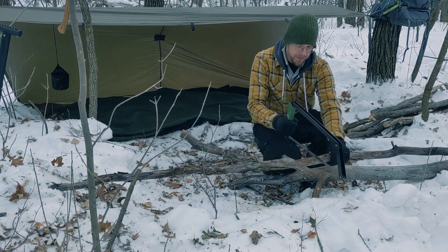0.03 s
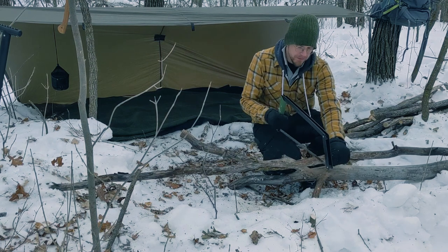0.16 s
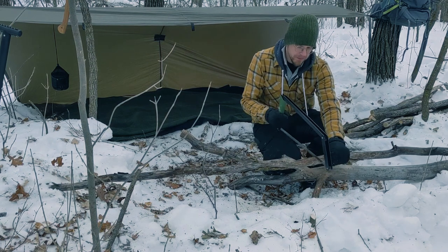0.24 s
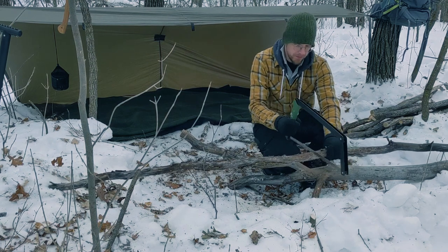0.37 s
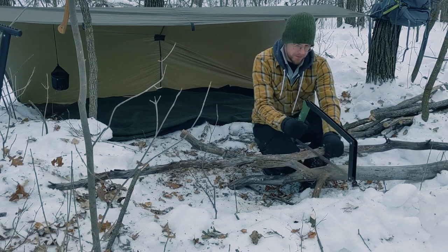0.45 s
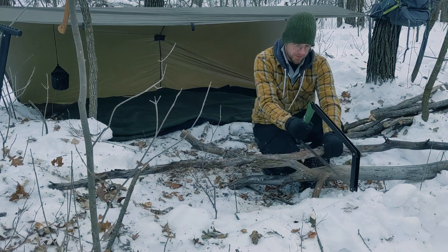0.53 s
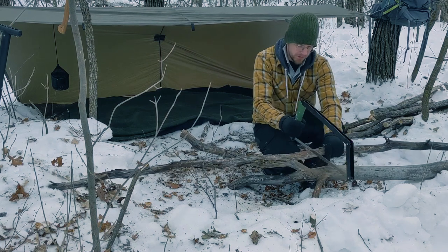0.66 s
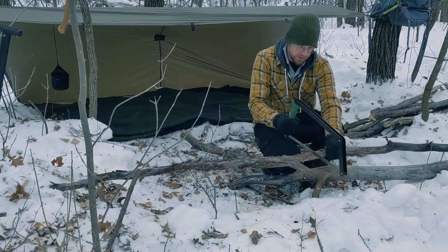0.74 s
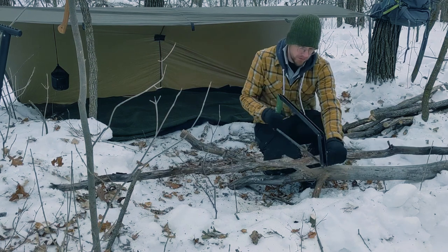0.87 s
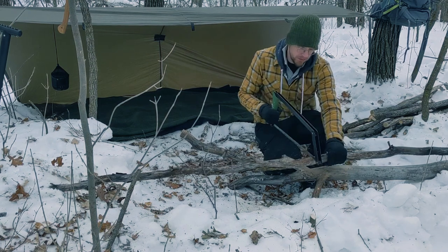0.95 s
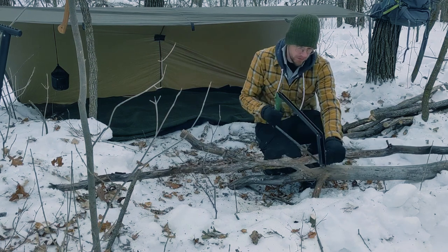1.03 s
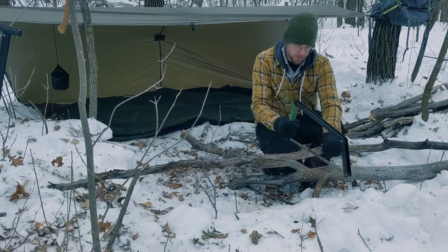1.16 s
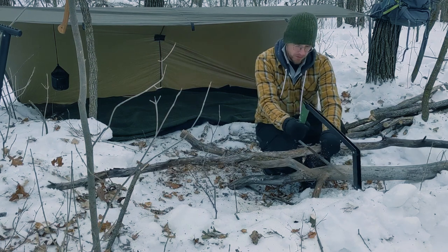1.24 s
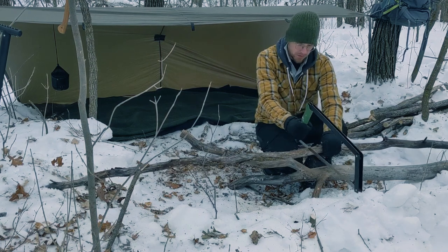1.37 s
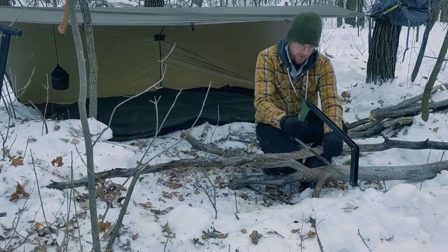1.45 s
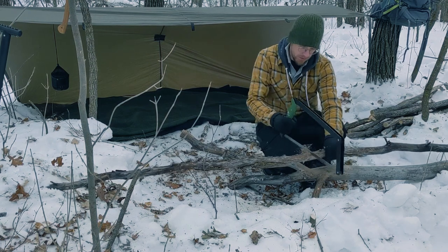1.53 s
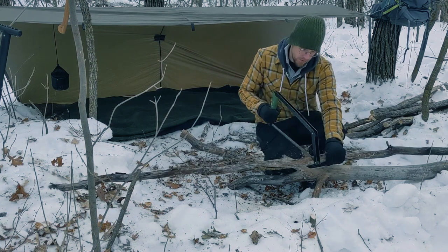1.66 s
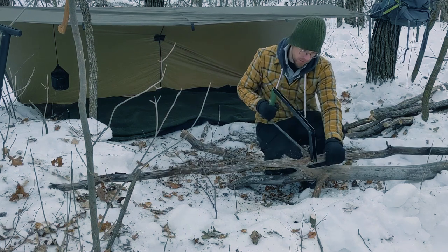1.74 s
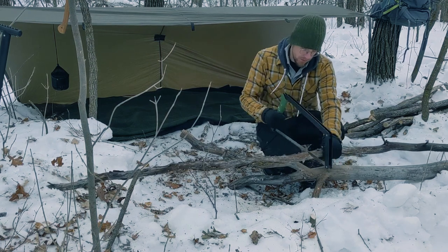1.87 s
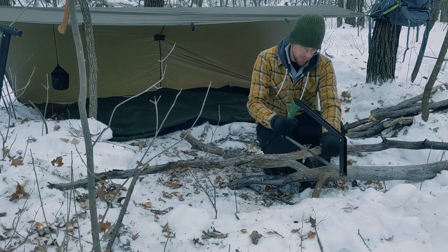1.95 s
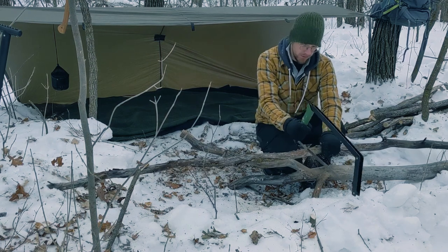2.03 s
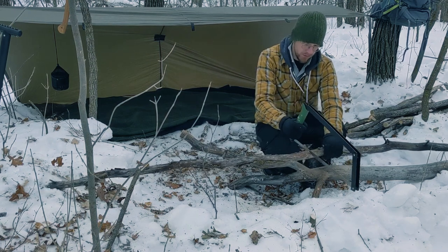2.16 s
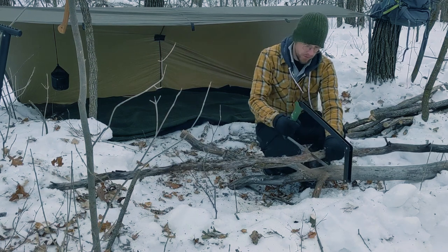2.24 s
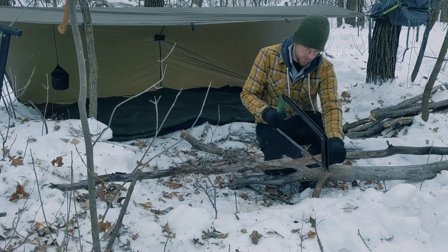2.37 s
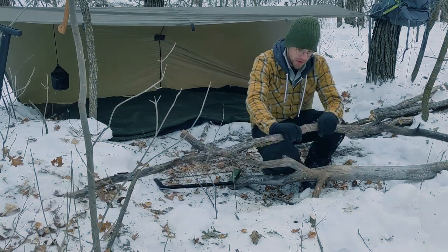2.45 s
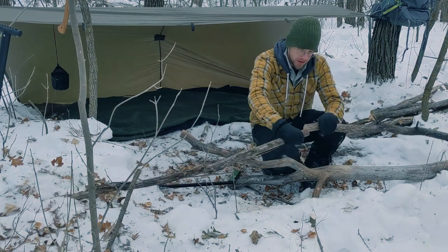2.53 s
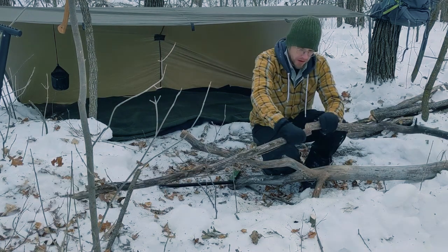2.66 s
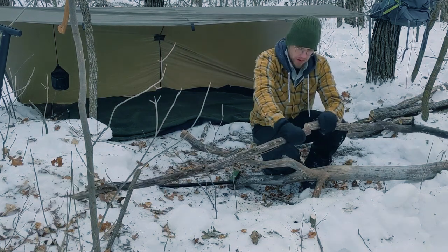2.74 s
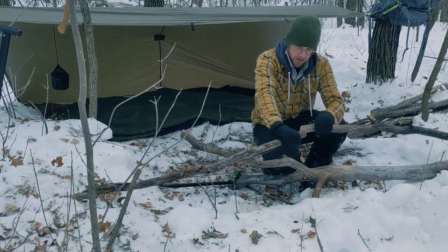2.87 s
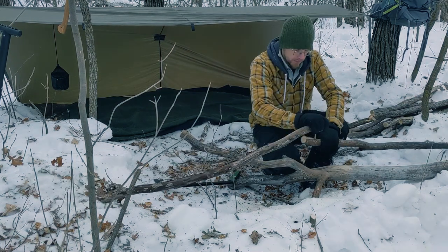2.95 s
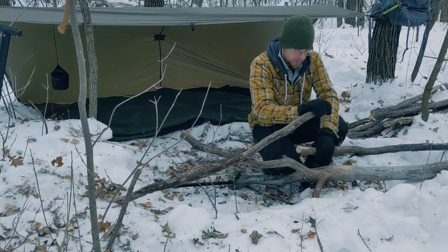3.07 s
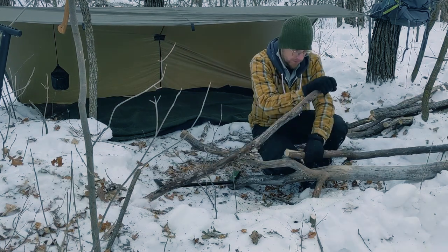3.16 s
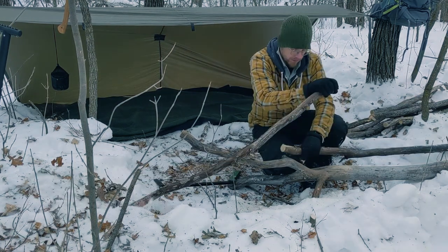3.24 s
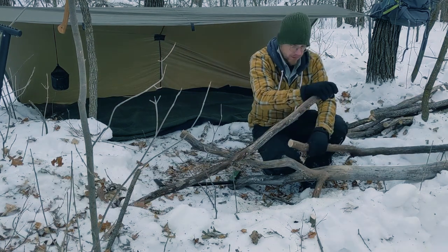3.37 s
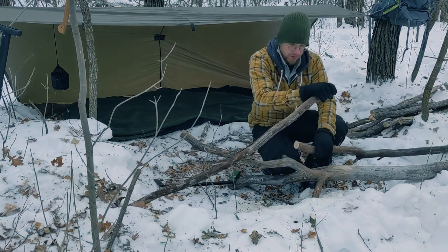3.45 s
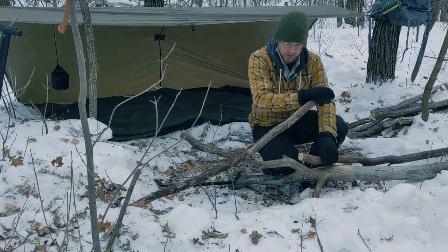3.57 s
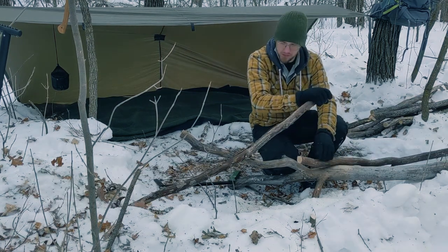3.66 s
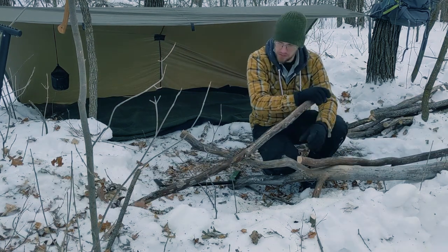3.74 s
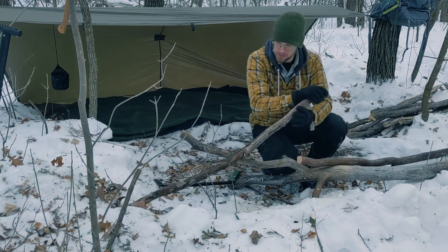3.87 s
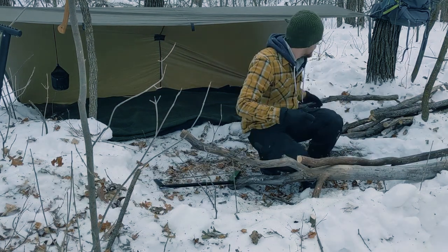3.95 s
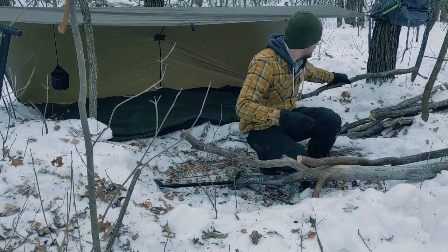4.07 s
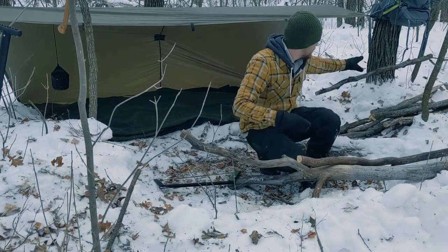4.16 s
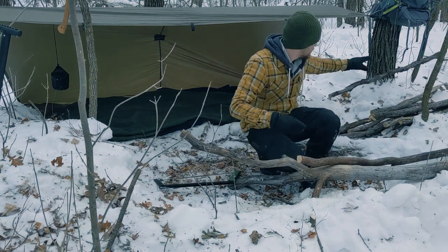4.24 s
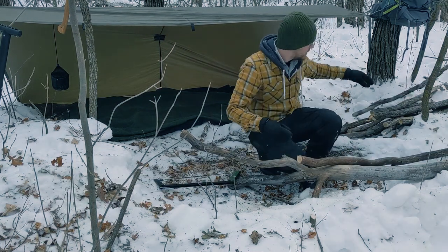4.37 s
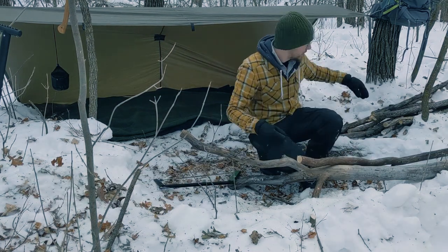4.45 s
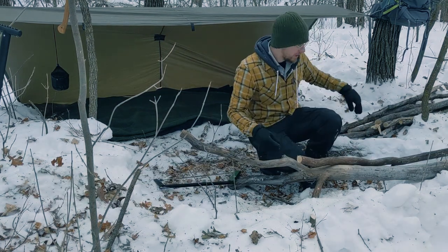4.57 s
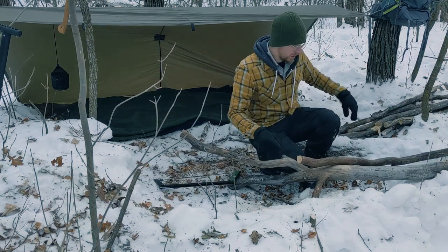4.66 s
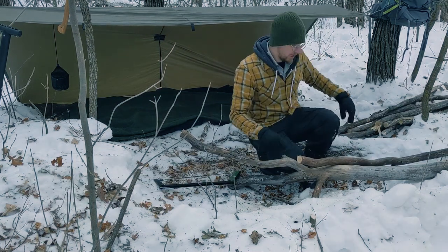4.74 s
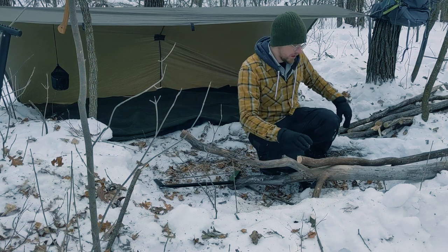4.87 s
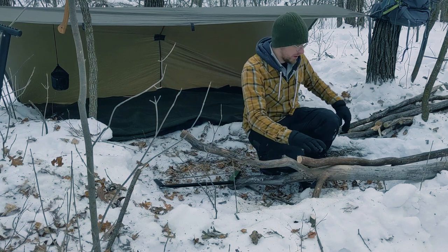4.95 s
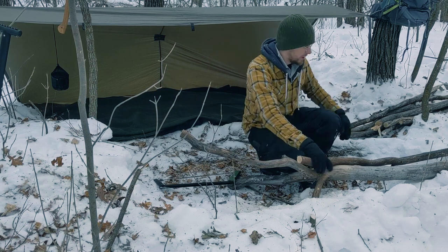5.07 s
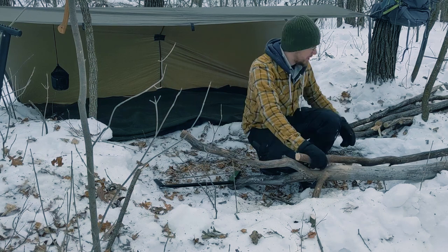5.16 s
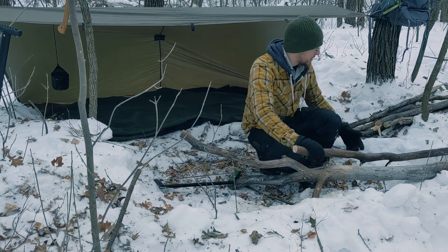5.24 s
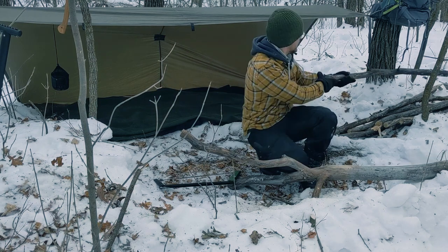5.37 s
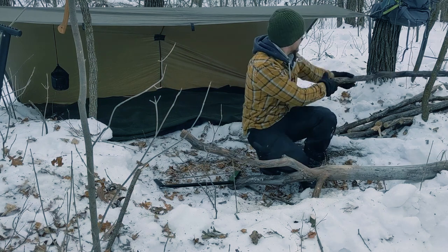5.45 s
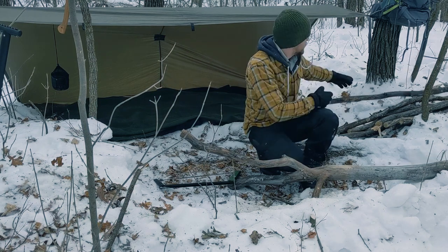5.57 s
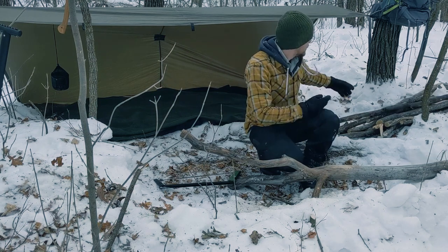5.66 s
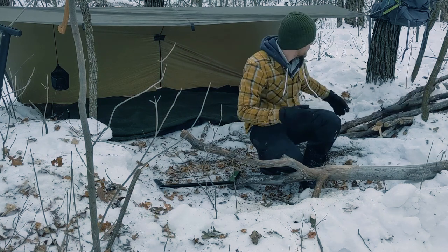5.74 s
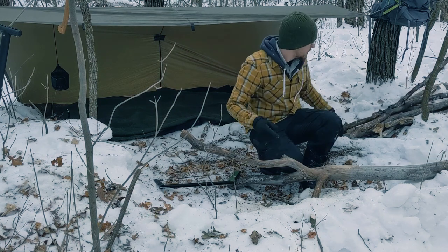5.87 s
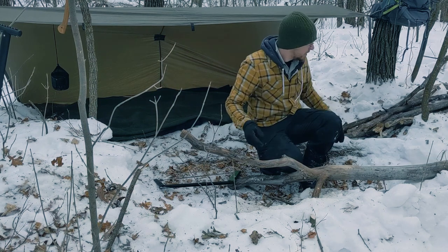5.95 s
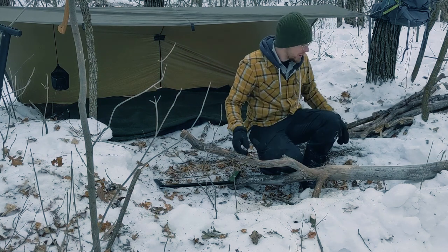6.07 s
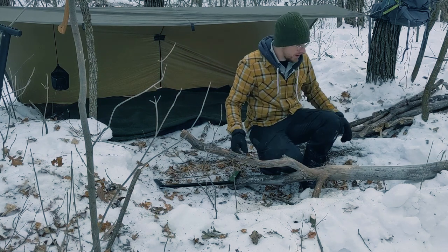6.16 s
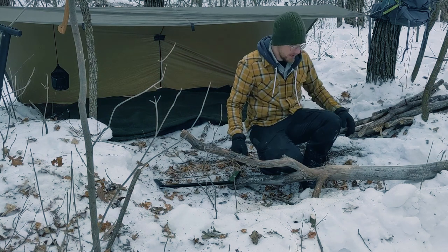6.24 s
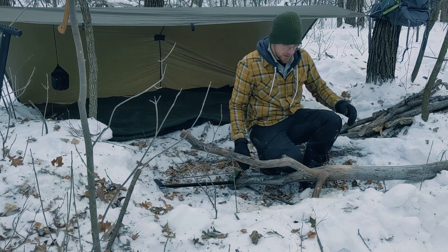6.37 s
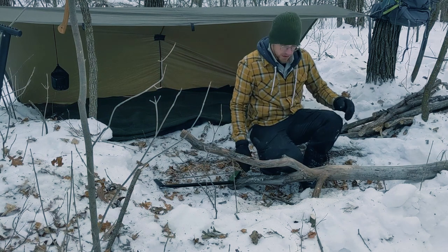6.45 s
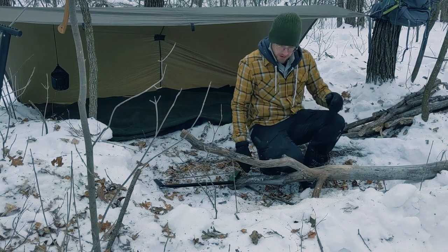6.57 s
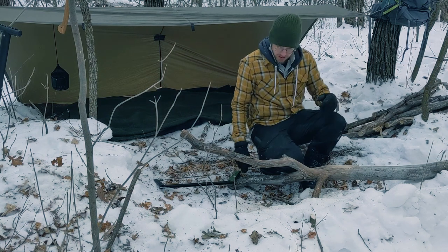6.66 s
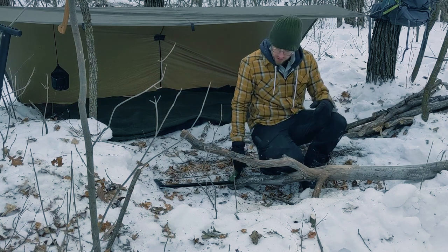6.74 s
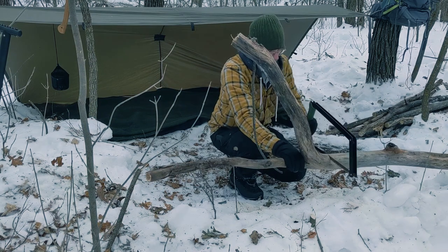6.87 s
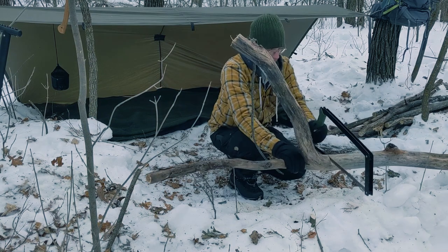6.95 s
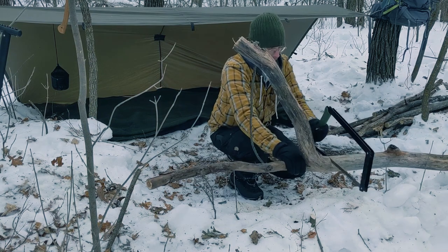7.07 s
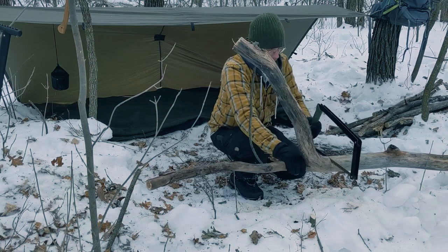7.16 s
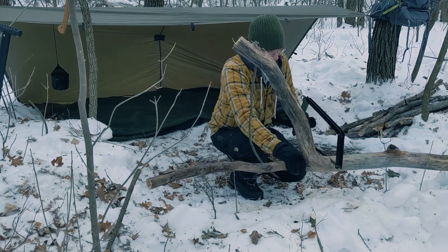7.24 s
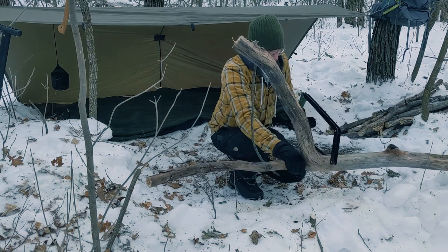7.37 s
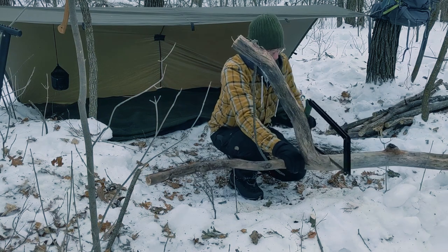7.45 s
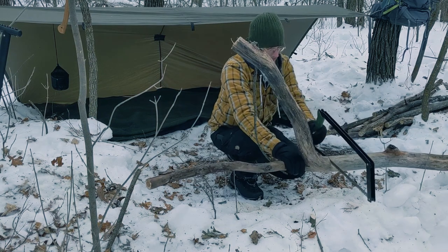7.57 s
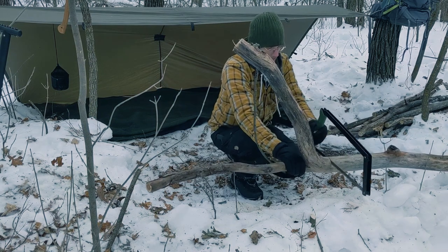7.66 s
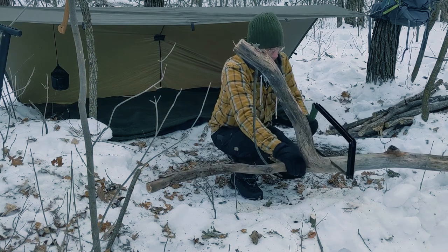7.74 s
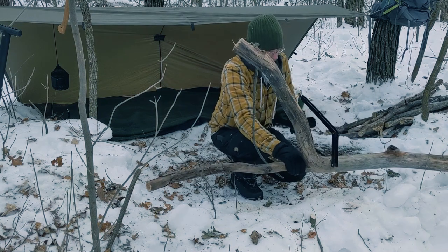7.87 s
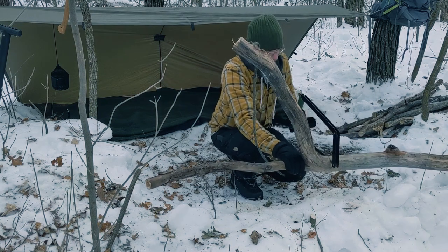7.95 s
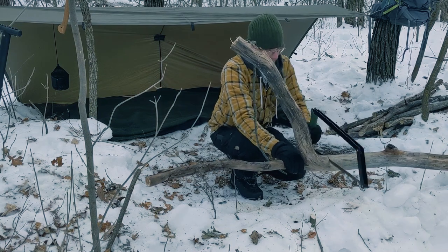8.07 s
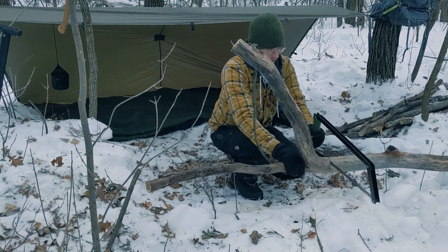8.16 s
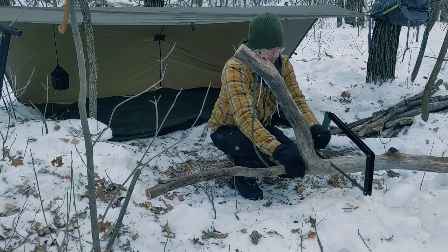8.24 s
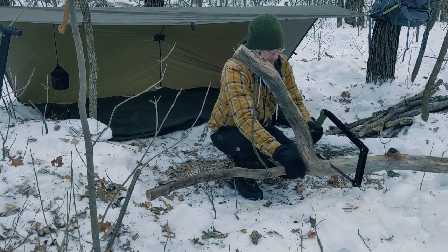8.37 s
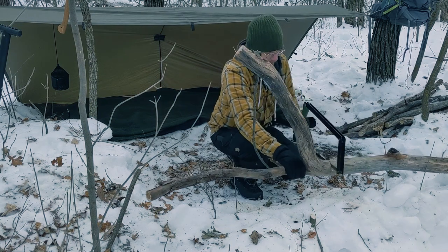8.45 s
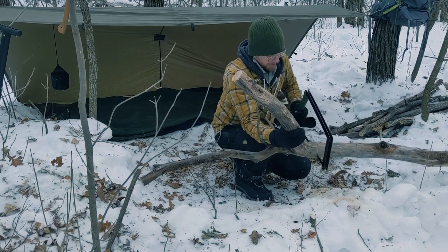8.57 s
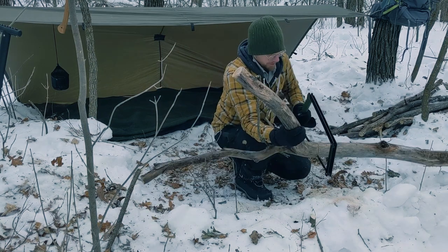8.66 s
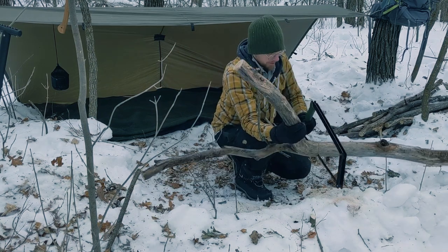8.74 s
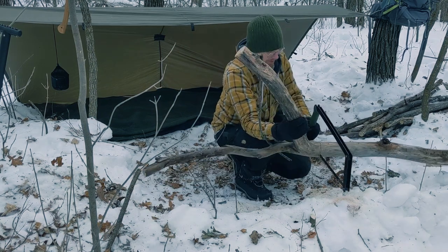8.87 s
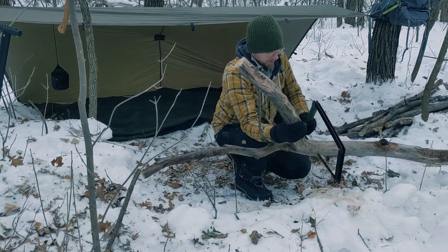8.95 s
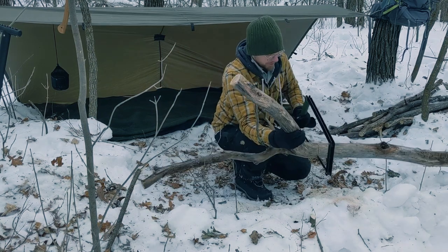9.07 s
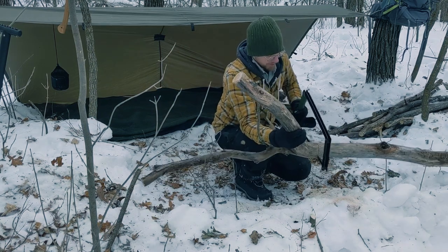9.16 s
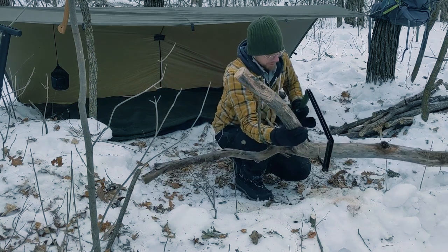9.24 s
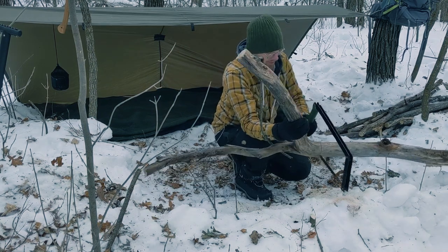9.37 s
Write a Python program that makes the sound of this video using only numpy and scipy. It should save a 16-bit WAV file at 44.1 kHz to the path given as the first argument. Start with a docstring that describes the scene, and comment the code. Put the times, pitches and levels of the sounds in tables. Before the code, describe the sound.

Steady hand sawing of dead wood, about two or three strokes a second, teeth drumming on the limb and the taut blade ringing. Then a pause with brittle snaps, soft snowy brushing, and hollow knocks as wood is tossed on a pile, with a faint woodland echo. A second sawing bout follows with sharper squeals. Outdoors, dry, microphone a few metres away, distant low rumble.

```python
"""A bow saw rasps through dead limbs in a snowy forest, in two bouts of push and pull strokes.
Its teeth knock on the wood, tear fibres and ring the taut blade, which squeals and chirps.
Between the bouts limbs drag through snow, twigs snap and cut pieces are tossed on a pile.
Knocks and sparks of noise excite resonances; a low rumble of filtered noise lies far behind."""
import sys
import numpy as np
from scipy import signal
from scipy.fft import rfft, irfft, next_fast_len
from scipy.io import wavfile
from scipy.ndimage import uniform_filter1d

SR = 44100
rng = np.random.default_rng(int(sys.argv[2]) if len(sys.argv) > 2 else 0)


def unload_audio(sound):
    """Save the sound as a 16-bit wav file, at the path given as the first command line argument."""
    columns = np.transpose(np.atleast_2d(sound))
    # keep every value between -1 and 1, then stretch to whole-number steps
    steps = np.round(np.clip(columns, -1, 1) * 32767)
    wavfile.write(sys.argv[1], SR, steps.astype(np.int16))


N = 414981
T = np.arange(N) / SR  # s

# Resonances of the limb under the saw. Each row: pitch in Hz, width in Hz, relative level in dB.
LIMB_MODES = [(182.5, 74, -2), (304, 45, 6.5), (428, 85, 7.5), (510, 100, 7), (652.5, 37, 4),
              (860, 200, -1.5), (1078, 30, 0.5), (1080, 74, -12.5)]
# Colour of the tearing fibres, one list a bout. Each row: frequency in Hz, relative level in dB.
RASP_COLOURS = [
    [(150, -20), (600, -13), (1000, -9.5), (1400, -7), (1750, -3), (2400, -3), (3500, -2.5), (4200, -5),
     (4550, -4), (5000, -6.5), (6000, -8), (8000, -5), (16000, -29)],
    [(150, -11), (600, -6.5), (1000, -7), (1400, -5), (1750, -1), (2400, -0.5), (3500, 0.5), (4200, 0.5),
     (4550, -13.5), (5000, -5.5), (6000, -6), (8000, -44), (16000, -62)],
]
# Wood knocks on wood. Each row: start in seconds, relative peak in dB, brightness in Hz,
# which cut piece (0 or 1), ring t60 in seconds.
WOOD_KNOCKS = [(3.159, -18.5, 1320, 0, 0.034), (3.713, -18, 1180, 1, 0.16), (3.725, -19.5, 484, 0, 0.14),
               (4.52, -13, 1400, 0, 0.078), (4.526, -3.5, 1900, 0, 0.037), (4.533, -3, 1110, 0, 0.14),
               (4.6, -28, 1200, 0, 0.087), (4.706, -33.5, 1300, 0, 0.13), (4.8, -40.5, 1300, 0, .07),
               (5.733, -4, 925, 1, 0.14), (5.7578, -8.5, 900, 1, 0.16), (5.809, -18.5, 890, 1, 0.14),
               (5.833, -21, 696, 1, 0.045), (5.892, -23.5, 825, 1, 0.21), (5.916, -15.5, 880, 1, 0.13),
               (6.22, -17, 1390, 1, .1), (6.336, -33.5, 1230, 1, .13)]


def undb(db):
    """Decibels to gain."""
    return 10 ** (np.asarray(db) / 20)


def unit(x):
    """Scale to rms 1."""
    return x / np.sqrt(np.mean(x ** 2))


def peak(x):
    """Scale to peak 1."""
    return x / np.abs(x).max()


def through(x, response):
    """Pass a sound through an impulse response."""
    return signal.oaconvolve(x, response)[:len(x)]


def colour(points, size=4096):
    """Minimum-phase response with a spectrum of (Hz, dB) points, by folding the cepstrum."""
    hz, db = np.transpose(points)
    f = np.maximum(np.fft.rfftfreq(size, 1 / SR), 1)
    spectrum_db = np.interp(np.log(f), np.log(hz), db)
    cepstrum = irfft(np.log(undb(spectrum_db)))
    cepstrum[1:size // 2] *= 2
    cepstrum[size // 2 + 1:] = 0
    return irfft(np.exp(rfft(cepstrum)))


def body(modes, size=4096):
    """Dying cosines of a set of (Hz, width Hz, dB) resonances: the wider, the faster they die."""
    t = T[:size]
    response = np.zeros(size)
    for k, (hz, width, db) in enumerate(modes):
        decay = np.exp(-np.pi * width * t)
        response += (-1) ** k * undb(db) * width / SR * decay * np.cos(2 * np.pi * hz * t)
    return response


def walk(rate):
    """Smoothed random wandering with rms 1, drawn afresh rate times a second."""
    k = max(int(SR / rate), 1)
    steps = np.repeat(rng.standard_normal(N // k + 1), k)
    return unit(uniform_filter1d(steps, k)[:N])


def steady(x, span_s=0.051):
    """Hold a texture near rms 1, keeping the level changes faster than the span."""
    power = uniform_filter1d(x ** 2, int(span_s * SR))
    return x / np.sqrt(np.abs(power) + 1e-12)


def crackle(rate, spread_db):
    """Tiny fractures of uneven size at random times, on average rate a second."""
    happens = rng.random(N) < rate / SR
    return happens * rng.standard_normal(N) * undb(spread_db * rng.standard_normal(N))


def burst(t60, size=12000):
    """A dying puff of noise."""
    return rng.standard_normal(size) * undb(-60 * T[:size] / max(t60, 1e-3))


def bell(s, half_s):
    """A smooth swell to 1 around a time."""
    return np.exp(-np.minimum(((T - s) / half_s) ** 2, 60))


def add(out, s, sound):
    """Mix a short sound in at a time."""
    i = max(int(s * SR), 0)
    out[i:i + len(sound)] += sound[:N - i]


def strokes(rows):
    """Blade speed (0-1) and powers of rasp, drumming, squeal and hiss, all falling as the blade slows."""
    # Fall in dB of rasp, drumming, squeal and hiss as the blade turns round.
    turn_drop_db = [22.2, 19, 19.6, 22.2]
    dust_flatness = 0.68  # share of the stroke's flatness: the hiss keeps its own curve
    glide_db, catch_db = -1.5, 3.5  # the teeth slide quietly, then catch with a jerk
    catch_s, catch_rise_s = .025, 0.0025  # fade of the jerk, time the teeth take to catch
    speed, power = np.zeros(N), np.full((4, N), 1e-12)
    for s, rise_s, fall_s, flatness, jerk_at_s, *levels in rows:
        near = slice(*np.searchsorted(T, [s - 2 * rise_s, s + 2 * fall_s]))
        t = T[near]
        offset = np.maximum((s - t) / rise_s, (t - s) / fall_s)
        slack = offset ** flatness
        speed[near] = np.maximum(speed[near], 1 - slack)
        caught = .5 + .5 * np.tanh((t - jerk_at_s) / catch_rise_s)
        jerk_db = catch_db * np.exp(-np.abs(t - jerk_at_s) / catch_s)
        grip_db = (1 - caught) * glide_db + caught * jerk_db
        for k in range(3):
            power[k, near] += undb(levels[k] + grip_db - turn_drop_db[k] * slack) ** 2
        dust_slack = offset ** (flatness * dust_flatness)
        power[3, near] += undb(levels[3] - turn_drop_db[3] * dust_slack) ** 2
    return speed, power


def bites(free_hz):
    """Teeth dig in and lock into a groan: tooth rate pulled towards its pitch, and the groans' power."""
    # Each row: loudest at in seconds, half length in seconds, relative level in dB,
    # tooth rate in Hz, glide in octaves per second.
    groans = [(.16, .025, -19.5, 205.2, -3), (0.496, .04, -16, 217.7, 0.97), (.822, .022, -21.5, 204.7, 1),
              (.93, .05, -23, 219.5, 0), (1.245, .028, -21, 256.1, 2), (1.3, .034, -17.5, 277.5, -2.5),
              (1.674, .024, -14, 217.6, 0), (1.746, .02, -22.5, 243.6, 2.5), (1.979, .022, -23, 238.9, 3.5),
              (2.075, .036, -16.5, 271.4, -2.5), (2.432, .04, -22, 196.9, 0),
              (7.014, .036, -15.5, 305.7, -5), (7.617, .036, -15, 380.7, -6.5),
              (7.875, .028, -22, 253.9, 0.5), (8.18, .027, -15.5, 359.1, -5.5),
              (8.23, .025, -17.5, 257.5, -12), (8.635, .03, -27, 322.5, 0), (8.786, .025, -23, 319.6, 0),
              (8.85, .04, -19, 278.8, 1), (9.042, .025, -28.5, 322.8, 0.5), (9.164, .032, -17.5, 372, 2.5)]
    sharpness, pull = 1.5, 30  # how abruptly a groan comes and goes, how firmly it holds the rate
    hz, weight, power = free_hz.copy(), np.ones(N), np.zeros(N)
    for s, half_s, db, bite_hz, glide in groans:
        near = slice(*np.searchsorted(T, [s - 3 * half_s, s + 3 * half_s]))
        t = T[near] - s
        swell = np.exp(-sharpness * (t / half_s) ** 2)
        hz[near] += pull * swell * bite_hz * 2 ** (glide * t)
        weight[near] += pull * swell
        power[near] += undb(db) ** 2 * swell
    return hz / weight, power


def teeth(hz, jitter, scatter_db, tear_share):
    """Each tooth gives one knock, then a fading pull on the fibres."""
    turns = np.cumsum(hz * (1 + jitter * walk(300))) / SR
    tooth = turns.astype(int)
    force = undb(scatter_db * rng.standard_normal(tooth.max() + 1))[tooth]
    knocks = np.diff(tooth, prepend=0) * force
    return knocks, force * np.exp(-(turns % 1) / tear_share)


def sliding(x, rows, trip_s=.0011, swing=.3, echo=.45):
    """Waves bounce between the cut and the blade's end; that length changes along each stroke."""
    turns = [s - rise_s for s, rise_s, *_ in rows] + [rows[-1][0] + rows[-1][2]]
    travel = np.cos(np.pi * np.interp(T, turns, np.arange(len(turns))))
    trip = trip_s * (1 + swing * travel + 0.071 * walk(25))
    return x + sum(echo ** k * np.interp(T - k * trip, T, x) for k in range(1, 4))


def singing(hz, rubbed_db, span):
    """Friction keeps the blade's strongest mode singing in fits, slightly off pitch, with flares."""
    # Each row: loudest at in seconds, half length in seconds, relative level in dB.
    flare_rows = [(1.032, 0.02, -17.5), (1.312, 0.014, -17), (2.094, 0.01, -12), (7.66, 0.0204, -12),
                  (7.847, 0.017, -7.5), (7.965, .012, -20.5), (8.134, 0.02, -14.5), (8.477, 0.015, -10.5),
                  (8.869, .016, -16)]
    wander_hz = 17  # rms waver of the pitch
    fits_db, fits_per_s = 6.5, 50  # the squeal comes and goes
    phase = 2 * np.pi * np.cumsum(hz + wander_hz * walk(90)) / SR
    fits = unit(undb(fits_db * np.minimum(walk(fits_per_s), 1))) * undb(rubbed_db - 2.0)
    flares = sum(undb(db) ** 2 * bell(s, half_s) for s, half_s, db in flare_rows if span[0] < s < span[1])
    return unit(np.sin(phase)) * np.sqrt(fits ** 2 + flares)


def saw(span, rows, teeth_hz, rasp_colour, squeal_hz):
    """One bout, middle and side: teeth drum on the limb, fibres rasp and ring the blade, dust hisses."""
    # Resonances of the taut blade. Each row: pitch in Hz, width in Hz, relative level in dB.
    blade_modes = [(2311, 26, -0.5), (2464, 22, 1.5), (2761, 38, -0.5), (2990, 22, 0), (3276, 64, -3),
                   (3790, 26, -9.5), (3913, 50, -2.5), (4314, 45, -5), (4733, 48, -2), (4904, 48, -2),
                   (5308, 55, -3.5), (6006, 50, -7.5), (6480, 54, -10), (6835, 60, -3), (7370, 30, -11),
                   (7930, 49, -12), (8600, 33, -16)]
    # Colour of the sawdust. Each row: frequency in Hz, relative level in dB.
    dust_colour = [(2000, -29), (5500, -15), (7200, 7), (9000, 6.5), (11500, 5), (12600, 0.5),
                   (14000, -1.5), (16000, -12.5)]
    # The teeth themselves ring high up. Each row: pitch in Hz, width in Hz, relative level in dB.
    tooth_modes = [(12420, 230, 0.5), (13100, 260, -15), (13900, 495, -4)]
    crawl = .22  # the free tooth rate never falls below this share of its full value

    speed, (rasp_power, drum_power, squeal_power, dust_power) = strokes(rows)
    hz, groan_power = bites(teeth_hz * np.maximum(speed, crawl))
    grain_db = .45 * walk(45)  # the wood is unevenly hard
    powers = [rasp_power, drum_power + groan_power, squeal_power, dust_power]
    rasp_db, bite_db, squeal_db, dust_db = 10 * np.log10(powers) + grain_db
    contact = uniform_filter1d(1. * ((T >= span[0]) & (T <= span[1])), size=60)

    # a deep bite locks the teeth into step; a light one lets them skip and the blade judder
    skip = np.clip((-21 - bite_db) / 9, 0, 1)
    knocks, pull = teeth(hz, jitter=.027 + .14 * skip, scatter_db=2.5, tear_share=0.82)
    judder = undb((0.6 + 0.95 * skip) * walk(60))
    layers = []
    for squeal_gain in undb([-1.2, -6]):  # middle, side: fibres drawn apart, squeal weaker in the side
        fibres = steady(crackle(rate=12000, spread_db=2.5) * (.7 + pull) * judder, span_s=.06)
        drum = through(steady(knocks * judder) + (0.25 + 0.34 * skip) * fibres, body(LIMB_MODES))
        wood = steady(drum) * undb(bite_db - 0.96)
        echoed = sliding(fibres, rows)
        tear = unit(through(echoed, colour(rasp_colour))) * undb(rasp_db + 0.72)
        ring = unit(through(fibres, body(blade_modes))) * undb(rasp_db - 1.5)
        dust = unit(through(echoed, colour(dust_colour))) * undb(dust_db - 4.5)
        scrape = rng.standard_normal(N) * (.7 + pull)
        dust += unit(through(scrape, body(tooth_modes))) * undb(dust_db - 5.5)
        squeal = singing(squeal_hz, squeal_db, span) * squeal_gain
        layers.append((wood + tear + dust + ring + squeal) * contact)
    return np.array(layers)


def air():
    """A low, gently wavering rumble from far off: coloured noise, partly unlike left and right."""
    # Rumble and still air. Each row: frequency in Hz, relative level in dB.
    air_colour = [(12, -60), (20, -30.5), (44, -11.5), (65, -2.5), (81, -7.5), (116, -6.5), (172, -4.5),
                  (285, -7.5), (446, -15.5), (542, -17), (949, -29), (1220, -34), (1440, -37),
                  (7730, -48.5), (16000, -58)]
    # Stereo width. Each row: frequency in Hz, side against middle in dB.
    air_width = [(30, -24.5), (250, -12.5), (1000, 2), (4000, -3.5), (12000, 4)]
    mid, side = (through(rng.standard_normal(N), colour(air_colour)) for _ in range(2))
    side = through(side, colour(air_width))
    return unit(np.array([mid + side, mid - side])) * undb(-37.5 + 0.23 * walk(5.6))


def binding():
    """Caught teeth jolt the limb, and the pinched blade chirps as narrow noise."""
    # A tooth catches and jolts the limb. Each row: start in seconds,
    # peak in dB of limb thump and rasp together.
    snags = [(0.162, -11), (0.763, -18.5), (.815, -10.5), (1.671, -9), (1.917, -30), (2.432, -7.5),
             (7.309, -13.5), (7.347, -19), (7.376, -30), (7.442, -22), (8.001, -14.5), (8.515, -13)]
    # The blade binds. Each row: loudest at in seconds, level in dB, pitch in Hz, half length in seconds.
    chirps = [(7.452, -10.5, 4860, 0.0052), (7.832, -19, 4670, 0.0056), (8.012, -16, 4960, 0.0089),
              (9.158, -14.5, 4845, .008)]
    out = np.zeros(N)
    for s, db in snags:
        jolt = burst(t60=0.079)
        thump = peak(through(jolt, body(LIMB_MODES)))
        tear = peak(through(jolt, colour(RASP_COLOURS[0])))
        add(out, s, undb(db) * peak(thump + 0.37 * tear))
    for s, db, hz, length in chirps:
        t = T[:int(6 * length * SR)] - 3 * length
        modes = [(hz, 200, 0), (hz * 1.09, 260, -3)]
        tone = unit(through(rng.standard_normal(len(t)), body(modes)))
        add(out, s + t[0], undb(db) * tone * np.exp(-(t / length) ** 2))
    return out


def stereo(middle, side):
    """The ports share the middle and oppose the side layer; phase and level part by frequency."""
    # Each row: frequency in Hz, squared coherence set by the mix (below 0 counts as 0).
    port_likeness = [(60, 0.89), (130, 0.95), (290, 0.93), (640, 0.82), (1410, 0.61), (3100, 0.59),
                     (6820, -0.18), (15000, 0.09)]
    # Each row: frequency in Hz, phase in radians by which the left port leads.
    port_lead = [(0, -1), (1120, 0.5), (1640, 0.7), (1890, 0.67), (2150, 0.3), (3620, 0.84), (4130, 0.53),
                 (4910, 1.77), (5340, 1.2), (7840, 4), (8100, 6), (10200, 4), (13000, 7), (15800, 3.5)]
    # Each row: frequency in Hz, left minus right in dB.
    port_tilt = [(60, 0.0), (110, -0.5), (200, 0.0), (380, -0.5), (700, -2), (1290, 0.0), (2380, -1.2),
                 (4400, -2), (8120, -0.5), (15000, -2.4)]
    size = next_fast_len(N)
    f = np.fft.rfftfreq(size, 1 / SR)
    tables = (port_likeness, port_lead, port_tilt)
    likeness, lead, tilt = (np.interp(f, *np.transpose(p)) for p in tables)
    alike = np.sqrt(np.clip(likeness, 0, 1))
    sign = np.array([[1], [-1]])  # left, right
    shared = np.sqrt((1 + alike) / 2) * rfft(middle, size)
    opposed = np.sqrt((1 - alike) / 2) * rfft(side, size)
    ports = shared + sign * opposed
    return irfft(ports * np.exp(sign * .5j * lead) * undb(sign * tilt / 2), size)[:, :N]


def brushing_level():
    """Gain of the rustle: each movement swells and fades, and each knock stirs some more."""
    # Limbs, boots and jacket brush through snow and leaves. Each row: loudest at in seconds,
    # relative level in dB, swell and fade in seconds over 20 dB (a row with a long negative fade is silent).
    swishes = [(2.5, -41.5, 0.016, 0.2), (2.575, -38, 0.018, 0.17), (3.03, -41.5, 0.29, 0.53),
               (3.162, -27.5, 0.04, 0.2652), (3.37, -39.5, 0.28, 0.34), (3.71, -38, 0.083, -0.37),
               (3.98, -51.5, 0.054, .03), (4.155, -45, .04, -0.54), (4.28, -48, 0.22, 0.23),
               (4.62, -46, 0.092, 0.37), (5.185, -50, .04, .2), (5.45, -46.5, 0.064, 0.33),
               (5.555, -42, .1, 0.05), (5.82, -31.5, 0.11, 0.04), (6.077, -41, 0.063, 0.03),
               (6.28, -46, 0.043, -0.8)]
    # a landing piece stirs bark and snow: dB for a 0 dB knock, dB per dB of knock
    stir_db, stir_slope = -30, 0.62
    stirs = [(s, stir_db + stir_slope * db, .004, 0.1) for s, db, *_ in WOOD_KNOCKS]
    power = np.zeros(N)
    for s, db, swell_s, fade_s in list(swishes) + stirs:
        near = slice(*np.searchsorted(T, [s - 2 * swell_s, s + 2 * fade_s]))
        offset = np.maximum((s - T[near]) / swell_s, (T[near] - s) / fade_s)
        power[near] += undb(db - 20 * offset) ** 2
    return np.sqrt(power)


def brushing():
    """Snow grains and cloth slide as dense crackle, with coarser ticks of bark, about 70 a second."""
    # Each row: frequency in Hz, relative level in dB.
    brush_colour = [(530, -31), (900, -3), (1440, -6.5), (1680, -2.5), (2330, -3.5), (4010, -6),
                    (7400, -4.5), (14900, -12), (16000, -14)]
    grains = unit(crackle(rate=9000, spread_db=4))
    grains = grains + .25 * unit(crackle(rate=70, spread_db=3))
    return unit(through(grains, colour(brush_colour))) * brushing_level() * undb(-3 + 0.37 * walk(40))


def twigs():
    """Twigs and bark snap: a sharp crack, a short woody ring and a fainter, longer sprinkle of bark."""
    # Each row: start in seconds, relative level in dB, relative woody body in dB,
    # base t60 in seconds (the crack takes 0.32 of it, the sprinkle 4 times).
    snaps = [(2.5714, -20.5, 3, 0.026), (2.616, -8.5, -3, 0.025), (2.7672, -23.5, -2, 0.013),
             (2.7781, -12, -2, 0.02), (3.1308, -15, -5, 0.02), (3.1438, -15.5, 3, 0.044),
             (3.647, -21.5, 6, 0.017), (4.143, -28.5, -8, 0.035), (4.528, -42, 16, .04),
             (4.618, -18, -6, 0.022), (4.6554, -19.5, -12, 0.015), (5.7351, -9.5, -14, 0.023),
             (5.757, -8, -3, 0.029), (5.82, -13.5, -12, 0.015), (5.8344, -33, -7, 0.018),
             (5.907, -20, -3, 0.014), (6.0771, -34, 5.5, 0.018), (6.2222, -24, 10, 0.032)]
    # Each row: frequency in Hz, relative level in dB.
    snap_colour = [(500, -2), (2000, -11.5), (4000, -8.5), (6500, 2.5), (9000, -3.5), (13000, -6),
                   (16000, -5.5)]
    out = np.zeros(N)
    for s, db, body_db, t60 in snaps:
        crack = burst(t60 * 0.32) + undb(-15.5) * burst(t60 * 4)
        stick = peak(through(crack, body([(980, 230, -0.031), (2160, 500, -0.95)])))
        bright = peak(through(crack, colour(snap_colour)))
        add(out, s, undb(db + 1.5) * (bright + undb(body_db - 6.0) * stick))
    return out


def woodpile():
    """A piece lands: its own modes ring, the pile clatters and the ground thuds."""
    # Two cut pieces of dry wood, one list each. Each row: mode in Hz, relative level in dB,
    # share of the knock's ring time.
    billets = [
        [(296, -13.5, 1.7), (460, -5.5, 1.4), (548, -5.5, 0.86), (728, -5, 0.91), (985, -3, 0.33),
         (1190, -2.5, 0.86), (1240, -2.5, 0.67), (1610, -7, 1.1), (1700, -29, 0.68), (2190, -10.5, 1.2)],
        [(217, -3.5, 2.05), (386, -1, 1.15), (533, -7, 1), (640, 3, 1), (729, 2, 0.69), (845, 0, 0.66),
         (900, -2, 0.93), (1033, 2, 0.64), (1170, -19, .8), (1435, -1, 0.8), (1880, -18, .6)],
    ]
    out, t = np.zeros(N), T[:12000]
    for s, db, bright_hz, piece, t60 in WOOD_KNOCKS:
        ring = np.zeros(len(t))
        for k, (hz, mode_db, share) in enumerate(billets[piece]):
            ring += (-1) ** k * undb(mode_db - 60 * t / (t60 * share)) * np.sin(2 * np.pi * hz * t)
        thud = undb(-24.5 - 60 * t / 0.36) * np.sin(2 * np.pi * 108 * t)
        contact = colour([(bright_hz / 8, -14), (bright_hz / 2, -1), (bright_hz, 0),
                          (bright_hz * 1.28, -7), (bright_hz * 3, -25), (bright_hz * 10, -42)])
        clatter = peak(through(burst(t60), contact))
        add(out, s, undb(db + 3.5) * peak(peak(through(ring, contact)) + 0.74 * clatter + thud))
    return out


def place(x, lag_s, scatter_db):
    """A small source: a lag between the ports, and treble scattered by nearby sticks."""
    sticks = through(burst(t60=.05, size=4096), colour([(300, -14), (1500, -5), (5000, 0)]))
    side = undb(scatter_db) * through(x, sticks / np.linalg.norm(sticks))
    return np.array([x + side, np.roll(x, int(lag_s * SR)) - side])


def forest(x, t60, wet_db, size=40000):
    """Trunks scatter a faint, dull tail of dying noise, drawn apart for each port."""
    shade = colour([(150, -12.5), (700, -7.5), (1250, -4.0), (1800, -1.0), (3000, -10.5), (10000, -28.0)])
    onset = 1 - np.exp(-T[:size] / 0.021)
    tails = [through(burst(t60, size=size) * onset, shade) for _ in range(2)]
    return undb(wet_db) * np.array([through(x, tail / np.linalg.norm(tail)) for tail in tails])


def scene():
    """Saw and woodpile a few metres ahead of the microphone."""
    # Each row: start and end of a sawing bout in seconds.
    bouts = [(0, 2.486), (6.904, 9.41)]
    # One list a bout. Each row: fastest at in seconds, speeding up and slowing down in seconds,
    # flatness (below 2 pointed, 2 round, 7 square), quiet slide ends with a jerk at in seconds
    # (outside the stroke: no jerk heard), then relative levels in dB of rasp, drumming of the limb,
    # blade squeal and sawdust hiss.
    stroke_rows = [
        [(-.088, 0.11, 0.15, 2.8, -1, -16, -32, -20.5, -19.5),
         (.171, 0.12, .16, 2.9, .083, -15.5, -28.5, -18.5, -22),
         (.525, 0.18, 0.15, 3.1, 0.6, -12.8, -25, -17.5, -15.5),
         (.916, .19, .18, 2.6, .764, -12.5, -26, -18, -15),
         (1.305, 0.2, .13, 2.9, 0.94, -13, -27.5, -19.5, -17),
         (1.69, 0.24, 0.2, 3.8, 1.74, -16, -31.5, -20, -20.5),
         (2.072, 0.19, 0.12, 3.6, 2.2, -11.5, -28.5, -14.5, -15),
         (2.411, 0.2, 0.22, 3.7, 2.255, -15.5, -25.5, -18, -22)],
        [(6.998, 0.16, 0.12, 2.1, 7.8, -11.5, -23.5, -13, -16.5),
         (7.398, 0.25, .078, 7, 7.3, -21, -31.5, -20.5, -24), (7.626, 0.16, 0.1, 2.7, 7.65, -13, -25, -15, -16),
         (7.899, .15, .145, 4.1, 6.9, -18.5, -31, -19, -22.5),
         (8.17, .12, .178, 2.6, 8.2, -13, -27, -17.5, -15),
         (8.52, 0.19, 0.16, 2, 7.5, -18, -27.5, -17.5, -21.5),
         (8.821, 0.11, 0.13, 1.9, 9.1, -15, -23.5, -15, -23.5),
         (9.165, 0.2, .128, 1.4, 9.2, -17, -22.5, -19.5, -23),
         (9.439, 0.093, 0.13, 3, 9.2, -17.5, -25, -21.5, -26)],
    ]
    # Teeth passing the cut per second at full speed, outside the groans, in each bout.
    full_teeth_hz = [222.4, 260]
    # The blade's strongest mode in Hz, in each bout, about which it wavers.
    squeal_hz = [1906, 1911]
    sawing = sum(saw(*bout) for bout in zip(bouts, stroke_rows, full_teeth_hz, RASP_COLOURS, squeal_hz))
    sawing = sawing + np.array([binding(), binding()])
    knocks = woodpile()
    near = stereo(*sawing)
    near += place(knocks, lag_s=.00012, scatter_db=-17.5)
    near += place(twigs(), lag_s=0, scatter_db=-1.5)
    near += brushing() + 0.99 * np.array([[1], [-1]]) * brushing()  # middle and side
    echoes = forest(knocks, t60=0.77, wet_db=-29.0) + forest(sawing[0], t60=.5, wet_db=-48.5)
    return near + echoes + air()


def record(dry):
    """The recorder drops the deepest bass, rounds the highest peaks and cuts the top above 16 kHz."""
    dry = signal.sosfilt(signal.butter(3, 36, "high", fs=SR, output="sos"), dry)
    rounded = dry / (1 + dry ** 6) ** (1 / 6)
    return signal.sosfilt(signal.ellip(10, .1, 70, 16000, fs=SR, output="sos"), rounded)


dry = scene()
out = record(dry)
unload_audio(out)
```